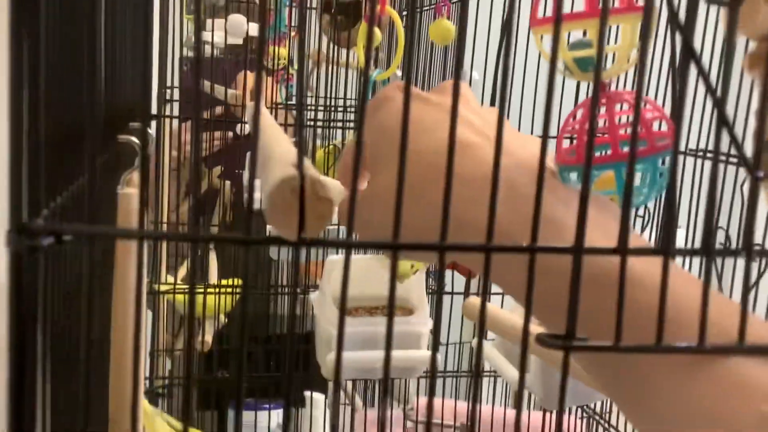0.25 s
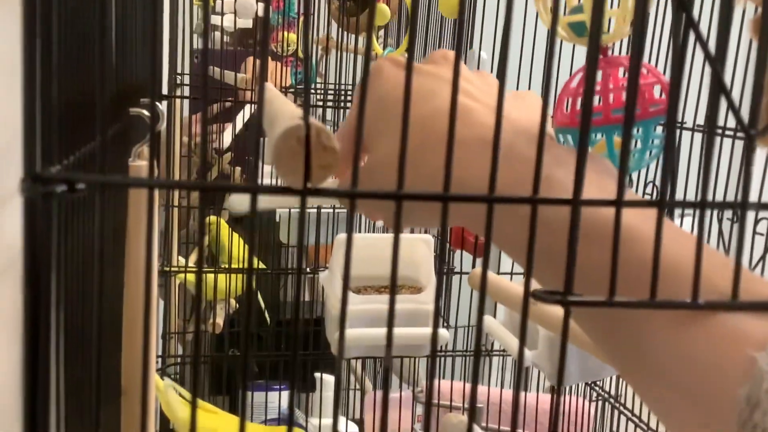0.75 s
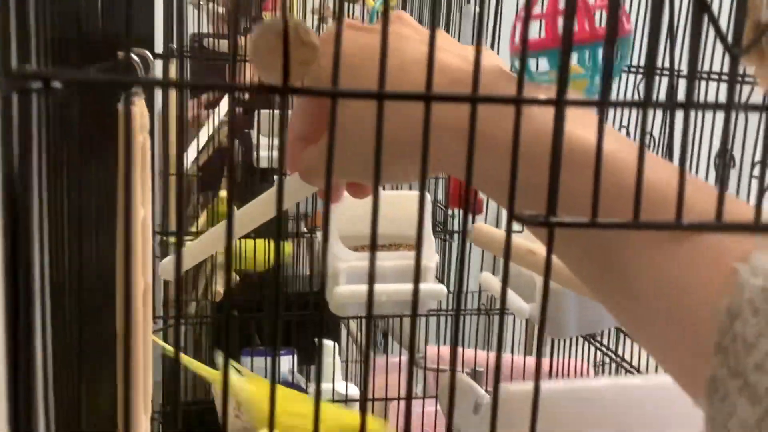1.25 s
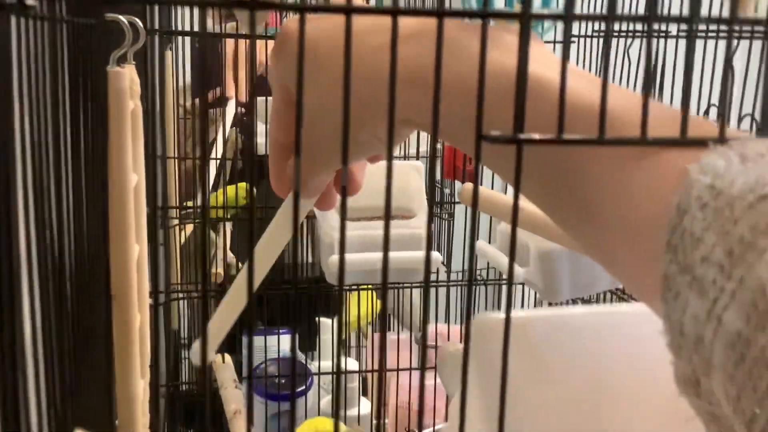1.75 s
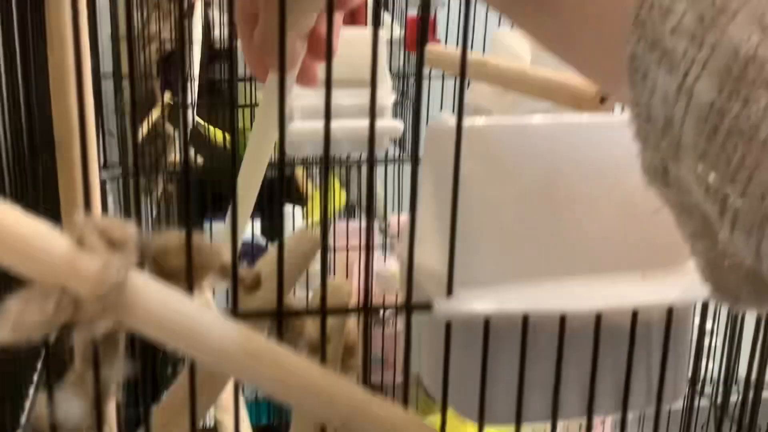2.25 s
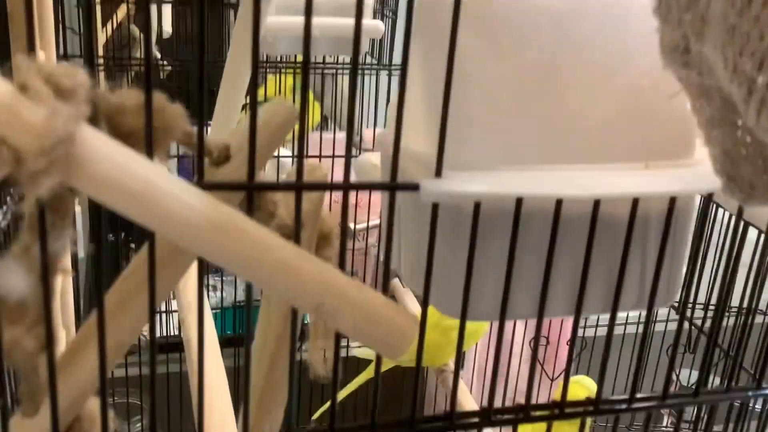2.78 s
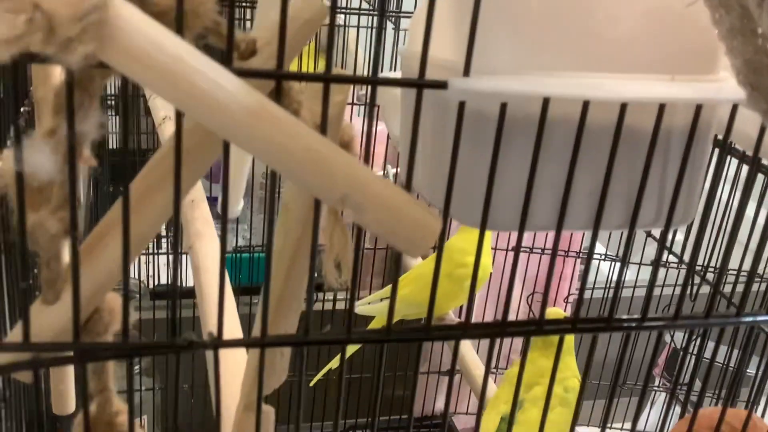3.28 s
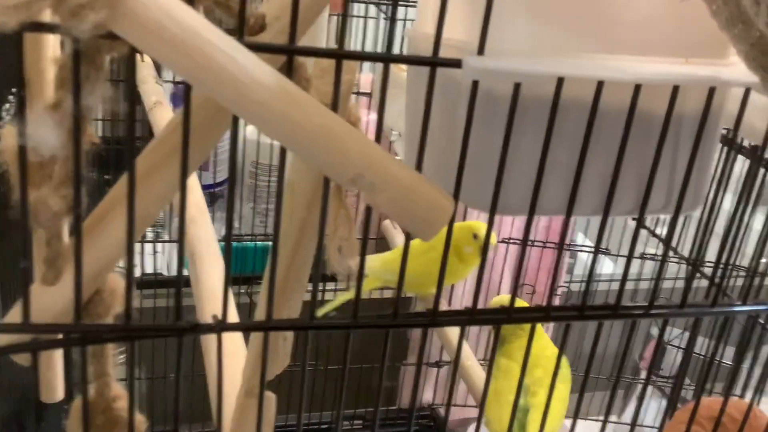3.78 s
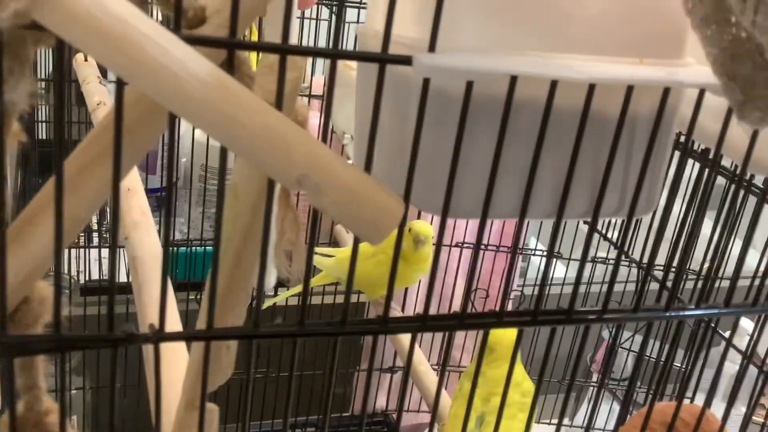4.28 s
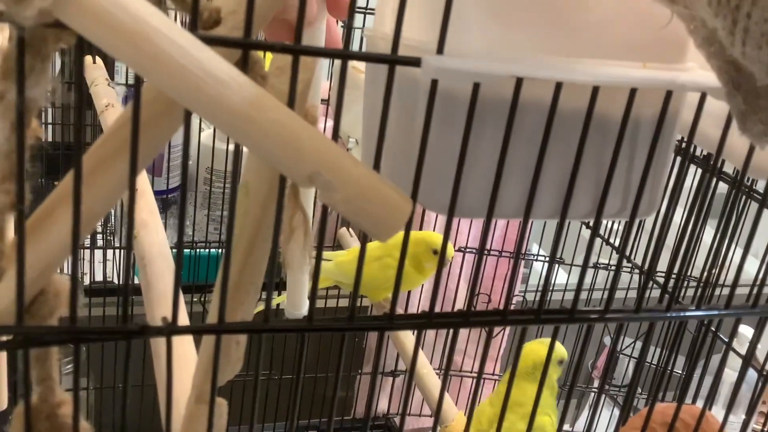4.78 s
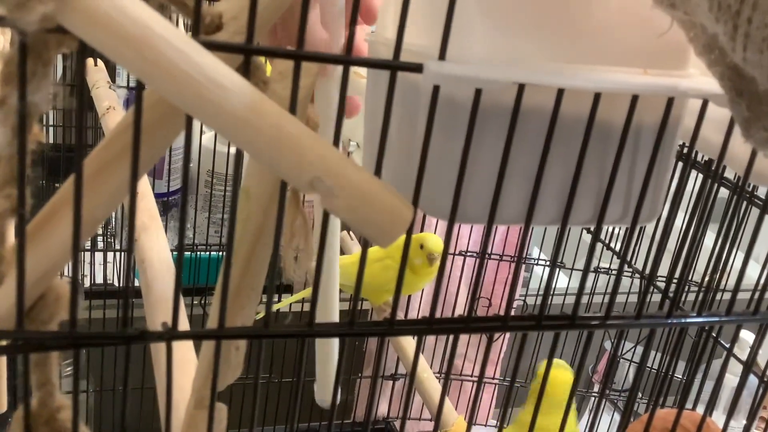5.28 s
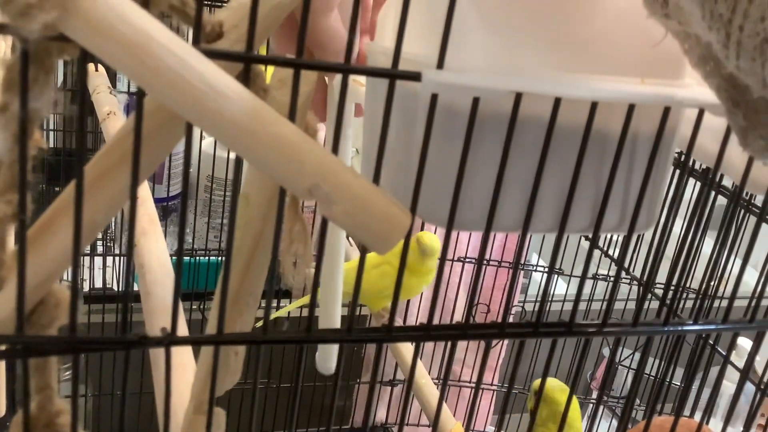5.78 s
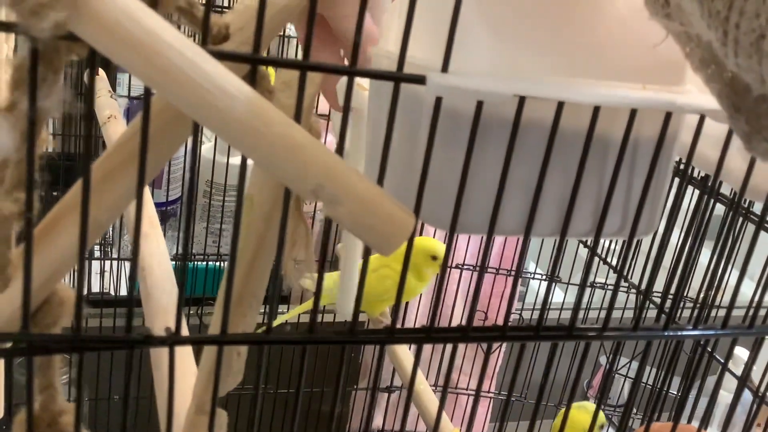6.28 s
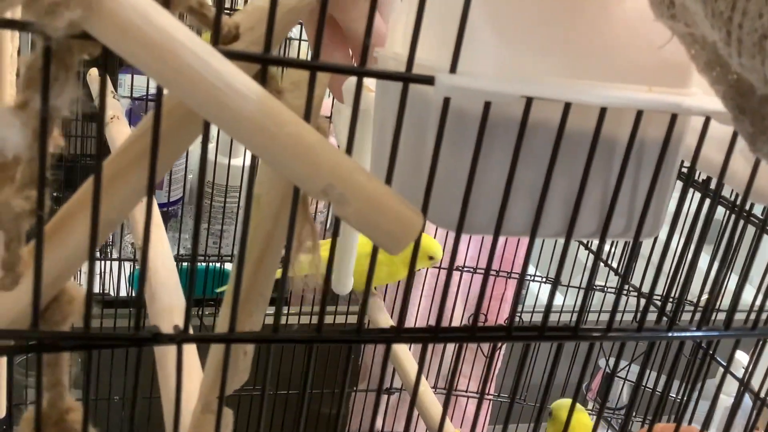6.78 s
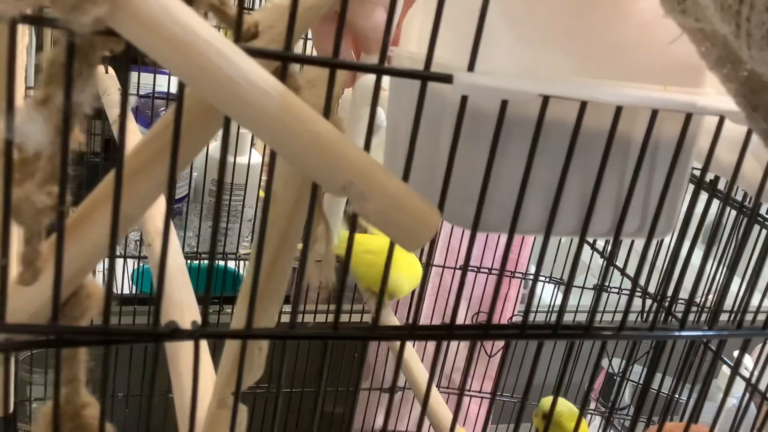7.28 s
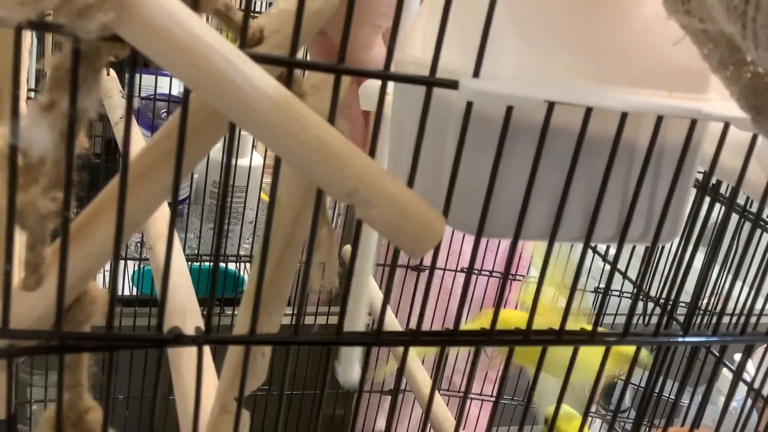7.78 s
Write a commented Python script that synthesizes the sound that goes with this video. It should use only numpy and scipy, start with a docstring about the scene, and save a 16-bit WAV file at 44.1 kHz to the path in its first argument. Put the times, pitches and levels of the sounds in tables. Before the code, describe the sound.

A close, handheld sound of a wire cage in a small, hard room, over very quiet bassy noise. From 0 to 0.4 s a plastic perch scrapes the bars with hiss and a faint metallic ring, while fingers rub the microphone dully. A tick and quick flutter lead at about 0.5 s to a harsh, raspy squawk with whistles in it; a second follows at 1.05 s. Knocks, scraping and a small flutter come near 1.4 s. At 2.3 s a sharp clack, wing puff and very short, loudest squawk coincide. From 2.4 to 3.8 s muffled rubbing and soft, falling thuds dominate. From 3.9 to 7 s there are sparse ticks, hollow plastic rasps, light scrapes and occasional bumps. Around 7.4 s scraping strokes increase, then at 7.75 s a click and a close burst of low, airy wingbeats with feather swish ends it.

```python
"""Frightened budgie in a wire cage

A hand reaches into the cage in a small, hard room and moves a plastic perch: filtered friction, ringing bars, ticks.
The bird flutters (pulsed air and feather noise) and gives three harsh squawks, chaotic pulses against whistles.
Fingers rub and bump the microphone casing (dull friction, falling thuds); at last a bird takes off close by."""
import sys
import numpy as np
from scipy import signal
from scipy.fft import rfft, irfft, next_fast_len
from scipy.io import wavfile
from scipy.ndimage import map_coordinates

SR = 44100
rng = np.random.default_rng(int(sys.argv[2]) if len(sys.argv) > 2 else 0)


def waveform_to_disk(signal):
    """Save audio, clipped to [-1, 1], as 16-bit WAV at the path in sys.argv[1]."""
    frames = np.transpose(np.atleast_2d(signal))
    scaled = np.clip(frames, -1, 1) * 32767
    samples = np.round(scaled).astype(np.int16)
    wavfile.write(sys.argv[1], SR, samples)


N = 354563  # samples

# thin cage wires: centre_hz, width_hz, relative level_db
BARS = [(2318, 110, -1.5), (3100, 76, -4), (4085.4, 150, -2), (4945.3, 210, -2), (5500, 130, 1),
        (8200, 240, -7)]
# hollow body of the perch: centre_hz, width_hz, relative level_db
HOLLOW = [(752.04, 49, 7.5), (1114, 87, -5), (1688, 82, -0.5), (2130, 970, -1.5)]


def amp(db):
    """Decibels to gain."""
    return 10 ** (np.asarray(db) / 20)


def unit(x):
    """Scale to rms 1."""
    return x / np.sqrt(np.mean(x ** 2) + 1e-20)


def along(points, hz):
    """Read (Hz, value) points on a log frequency axis."""
    f, value = np.transpose(points)
    return np.interp(np.log(hz + 1), np.log(f + 1), value)


def clock(length_s):
    """Sample times over a length in seconds."""
    return np.arange(round(length_s * SR)) / SR


def wobble(rate_hz, n):
    """Smooth random curve with rate_hz knots a second."""
    knots = rng.standard_normal(int(n * rate_hz / SR) + 4)
    return map_coordinates(knots, [np.arange(n) * rate_hz / SR])


def add(track, start_s, x):
    """Mix x into the track from start_s, cut at the track's end."""
    start = max(round(start_s * SR), 0)
    track[start:start + len(x)] += x[:max(len(track) - start, 0)]


def colour(x, points):
    """Minimum-phase filter shaped by (Hz, dB) points; the result has rms 1."""
    m = 2 * next_fast_len(len(x) // 2 + 4096)
    gain = amp(along(points, np.fft.rfftfreq(m, 1 / SR)))
    cepstrum = irfft(np.log(gain + 1e-6))
    # fold the cepstrum onto positive time
    cepstrum[1:m // 2] *= 2
    cepstrum[m // 2 + 1:] = 0
    return unit(irfft(rfft(x, m) * np.exp(rfft(cepstrum)))[:len(x)])


def ring(x, modes):
    """Parallel resonances (Hz, width Hz, dB) of alternating sign; the result has rms 1."""
    m = next_fast_len(len(x) + SR // 2)
    f = np.fft.rfftfreq(m, 1 / SR)
    response = 0
    for k, (centre_hz, width_hz, db) in enumerate(modes):
        damping = 1j * f * width_hz
        response = response + (-1) ** k * amp(db) * damping / (centre_hz ** 2 - f * f + damping)
    return unit(irfft(rfft(x, m) * response, m)[:len(x)])


def friction(rate_hz, spread_db, smooth):
    """Stick-slip: random tiny slips of uneven size on a smooth hiss; rms 1."""
    sizes = rng.standard_normal(N) * amp(spread_db * rng.standard_normal(N).clip(-2, 2))
    slips = (rng.random(N) < rate_hz / SR) * sizes
    return unit(unit(slips) + smooth * rng.standard_normal(N))


def envelope(t, length_s, rise_s, fall_s):
    """Soft attack, hold until length_s, exponential release."""
    return (1 - np.exp(-t / rise_s)) ** 2 * np.exp(-np.maximum(t - length_s, 0) / fall_s)


def gestures(rows, rise_s, fall_s):
    """One gain track per dB column of (start_s, length_s, dB, ..) rows; overlaps add in power."""
    power = np.zeros((len(rows[0]) - 2, N))
    for start_s, length_s, *levels in rows:
        shape = envelope(clock(length_s + 10 * fall_s), length_s, rise_s, fall_s)
        for track, db in zip(power, levels):
            add(track, start_s, (amp(db) * shape) ** 2)
    return np.sqrt(power)


def room(x, wet_db, gap_s=.006):
    """Direct sound, a few near reflections and a noise tail with frequency-dependent decay."""
    # tail decay: freq_hz, t60_s
    decay = [(150, 0.47), (1000, 0.51), (3000, 0.31149), (6000, 0.38), (9000, 0.39), (14000, .25)]
    # near surfaces: delay_s, gain
    walls = [(.0019, 0.17), (.0034, 0.11), (.0052, 0.1), (.0083, 0.15), (0.0126, .2), (.019, 0.12)]
    hz, t, z = signal.stft(rng.standard_normal((SR * 3) // 4), SR, nperseg=256)
    fading = z * amp(-60 * t / along(decay, hz)[:, None])
    tail = signal.istft(fading, SR, nperseg=256)[1]
    response = np.pad(amp(wet_db) * tail / np.linalg.norm(tail), (int(gap_s * SR), 0))
    for delay_s, gain in walls:
        add(response, delay_s, [gain])
    response[0] += 1  # direct sound
    return signal.fftconvolve(x, response)[:N]


def background(level_db=-64):
    """Steady quiet noise, strongest in the bass."""
    # noise spectrum: freq_hz, relative level_db
    spectrum = [(15, -44.5), (25, -17.5), (76, 3.5), (107, -2.5), (513, -11.5), (637, -20), (1010, -21),
                (1390, -31.5), (1640, -28.5), (2590, -34.5), (5520, -35), (6310, -35), (10300, -32.5),
                (15800, -36.5)]
    return amp(level_db) * colour(rng.standard_normal(N), spectrum)


def fingers(rise_s=0.015, fall_s=0.026, grip_db=-64.5, grip_swing_db=4.5, grip_rate_hz=11):
    """Dull friction of fingers on the casing: faint all the time, louder when they shift."""
    # finger shifts: start_s, length_s, level_db (before trim)
    rubs = [(0, 0.29, -51), (.25, 1.7, -61), (1.45, 0.37, -50.5), (1.95, 0.2627, -53.5),
            (2.37, 0.12, -43.5), (2.5, 0.2506, -53), (2.7, 0.39216, -45), (3.1, 0.14692, -49),
            (3.35, 0.08258, -48), (3.78, 0.12186, -53.5), (7.5, 0.4387, -56)]
    # rubbing spectrum: freq_hz, relative level_db
    spectrum = [(35, -47), (60, -5.5), (184, 2), (380, -2), (572, -12.5), (694, -26.5), (768, -17.5),
                (900, -17.5), (1170, -47.5), (1980, -120)]
    shifts, = gestures(rubs, rise_s, fall_s)
    grip = amp(grip_db + grip_swing_db * wobble(grip_rate_hz, N))
    rub = colour(friction(rate_hz=400, spread_db=4, smooth=1.3), spectrum)
    return np.hypot(shifts, grip) * amp(-5.5) * rub


def bumps(high_hz=430, low_hz=100, attack_s=0.005, pitch_fall_s=.011, t60_s=.05, rough=0.38):
    """Soft finger bumps disperse in the casing: the higher part arrives first, so pitch falls."""
    # bumps: start_s, level_db (peak is 5 dB lower)
    hits = [(0.961, -33.5), (1.692, -44), (1.77, -47), (2.71, -35.5), (2.809, -34), (3.056, -42),
            (3.171, -43.5), (3.351, -40.5), (3.414, -34), (3.788, -46), (5.052, -41), (5.201, -41),
            (6.372, -34.5), (6.659, -45)]
    out, t = np.zeros(N), np.arange(SR // 8) / SR
    for start_s, db in hits:
        hz = low_hz + (high_hz - low_hz) * np.exp(-t / pitch_fall_s)
        hz = hz * np.exp(0.066 * rng.standard_normal())  # pitch differs from bump to bump
        thud = np.sin(2 * np.pi * np.cumsum(hz) / SR)
        thud *= amp(-60 * t / t60_s) * (1 - np.exp(-t / attack_s)) ** 2
        thud *= 1 + rough * wobble(510, len(t))
        add(out, start_s, amp(db - 5.0) * thud / np.abs(thud).max())
    return out


def handling(rise_s=0.0032, fall_s=0.04):
    """Slips of the sliding perch or arm ring tray and wires, hiss, and make a single bar sing."""
    # slides: start_s, length_s, scrape_db, hiss_db, singing_bar_db (all before trims)
    slides = [(0, 0.0354, -49.5, -50.5, -66), (.045, .035, -42, -45.5, -54), (.135, .03, -42, -51, -55),
              (.2, 0.21, -53.5, -66.5, -68.5), (.6, 0.25, -60.5, -75, -64), (1.2, .17, -57.5, -72, -61),
              (1.38, 0.18, -51.5, -64.5, -63), (1.6, .52, -64, -71.5, -86.5), (2.12, 0.17, -65, -66, -87.5),
              (2.72, 0.2821, -61.5, -76.5, -85), (3.05, 0.18, -68, -83, -90.5),
              (3.6, 0.0963, -71.5, -78.5, -68), (3.77, 0.1522, -70.5, -79.5, -69.5),
              (3.95, 0.15, -58, -69, -63), (4.1, 0.56, -64, -77, -74), (4.77, 0.23, -63.5, -77.5, -78.5),
              (5.17, 0.089, -61, -65.5, -70.5), (5.34, 0.049, -53.5, -75, -66),
              (5.45, 0.45166, -64.5, -81.5, -72), (5.7, 0.13, -63.5, -72, -64),
              (5.95, 0.13, -67.5, -78.5, -79), (6.49, 0.063, -74.5, -74, -76),
              (6.585, .06, -68, -81, -61.5), (6.705, 0.065, -65.5, -81, -56.5),
              (6.8, 0.058, -66, -80, -71.5), (7.18, 0.29, -70.5, -80, -72.5), (7.41, .03, -63, -69, -64),
              (7.48, 0.078, -56, -78, -57.5), (7.59, 0.21, -57.5, -70, -70.5),
              (7.725, .04, -56, -55.5, -75.5)]
    # tray and bars: centre_hz, width_hz, relative level_db
    cage = [(533, 51, 6), (763.34, 41, 2.5), (1020, 62, -1), (1150, 66, -9), (1710, 80, -12)]
    # scrape spectrum: freq_hz, relative level_db
    scrape_points = [(240, -42), (400, -6), (555, -10.5), (848, -3), (1050, -4), (1260, -5), (2800, -18),
                     (4000, -22.5), (5200, -39.5), (8800, -120)]
    # hiss spectrum: freq_hz, relative level_db
    hiss_points = [(1180, -40.5), (2000, -4), (2400, -3), (2800, -5), (4750, -6.5), (6830, -12),
                   (8260, -5.5), (9080, -9.5), (14100, -13.5), (15800, -24)]
    # one rubbed bar: centre_hz, width_hz, relative level_db
    wire = [(1017.8, 10.43, 7), (1670, 39, -22), (5536.4, 69.427, -17)]
    scrape_gain, hiss_gain, singing_gain = gestures(slides, rise_s, fall_s)
    slips = friction(rate_hz=1700, spread_db=0.5, smooth=0.53)
    coarse_slips = friction(rate_hz=1400, spread_db=2.5, smooth=0.48)
    fine_slips = friction(rate_hz=2500, spread_db=2.5, smooth=1)
    scrape = amp(-6.5) * ring(slips, cage) + amp(-8.5) * colour(coarse_slips, scrape_points)
    hiss = amp(-4) * colour(fine_slips, hiss_points) + amp(-7) * ring(slips, BARS)
    singing_bar = amp(-5) * ring(rng.standard_normal(N), wire)
    pressure = amp(1.6 * wobble(25, N))
    return pressure * (scrape_gain * scrape + hiss_gain * hiss) + singing_gain * singing_bar


def strokes(rise_s=0.0015, release_s=.0063):
    """Short firm strokes along the bars rasp brightly and sound the hollow perch."""
    # strokes: start_s, length_s, grit_db, hollow_body_db
    rasps = [(3.62, 0.02989, -66.5, -70.5), (3.946, 0.073, -57.5, -58.5), (4.168, 0.029, -64.5, -64),
             (4.386, 0.0655, -74, -62), (4.543, 0.03156, -80, -64.5), (4.904, 0.07518, -89, -70.5),
             (5.661, 0.07, -61.5, -59), (7.388, 0.05637, -63.5, -70), (7.463, 0.074, -59, -61.5),
             (7.56, 0.046, -64, -68)]
    # grit spectrum: freq_hz, relative level_db
    grit_points = [(1500, -7), (2800, -3), (4200, -6), (5400, -1.5), (6600, -11), (8200, -4), (11000, -6.5),
                   (15500, -17)]
    slips = friction(rate_hz=1500, spread_db=3.5, smooth=0.69)
    grit = unit(colour(slips, grit_points) + amp(-15.5) * ring(slips, BARS))
    grit_gain, hollow_gain = gestures(rasps, rise_s, release_s)
    return grit_gain * grit + hollow_gain * ring(slips, HOLLOW)


def ticks(knock_t60_s=0.051, knock_rise_s=0.0048, snap=1.2, snap_t60_s=0.0023, chatter_t60_s=0.037):
    """Perch or claws touch the bars: a snap with short chatter, and a knock that rings the perch."""
    # touches: start_s, crack_db, knock_db (both before trims), brightness_db per octave
    touches = [(.373, -36, -59, 2.5), (1.371, -38.5, -43, -2), (1.407, -39, -44.5, -3),
               (2.319, -30, -37, -2), (2.852, -44, -49.5, -5), (2.963, -39.5, -62, 0),
               (3.777, -51, -59.5, 1.5), (3.866, -45, -57.5, 0.5), (3.888, -41, -51.5, -3.5),
               (4.016, -34, -52, -2), (4.327, -35, -58, 1.5), (4.343, -37, -68.5, 0.5),
               (4.538, -37.5, -46, 3), (4.776, -47, -59, -2.5), (4.9, -37.5, -48.5, .5),
               (5.164, -44, -60.5, -6.5), (5.183, -44.5, -71.5, -3), (5.209, -43, -66, -8),
               (5.225, -42, -64.5, -6.5), (5.241, -32.5, -67, 0.5), (5.343, -35, -45.5, 1),
               (5.561, -40, -63, 3), (5.753, -31, -51.5, 2.5), (5.897, -50, -70, 2), (6.083, -51, -70, 3),
               (6.705, -54, -57, -2), (6.815, -52, -64, -3), (7.778, -31.5, -45, -1.5)]
    # crack spectrum: freq_hz, relative level_db
    spectrum = [(800, -25.5), (2500, -8), (5300, 1), (7000, 0.5), (9000, 1.5), (15500, 1)]
    # plastic perch: centre_hz, width_hz, relative level_db
    perch = [(512, 34, 9.5), (771, 84, -6), (986, 87.7, -3.5), (1680, 100, -1), (2040, 270, -9),
             (2818, 710, -13.5)]
    out, t = np.zeros(N), np.arange(SR // 5) / SR
    crack_force = snap * amp(-60 * t / snap_t60_s) + amp(-60 * t / chatter_t60_s)
    knock_force = amp(-60 * t / knock_t60_s) * (1 - np.exp(-t / knock_rise_s))
    for start_s, crack_db, knock_db, bright_db in touches:
        tilted = [(hz, db + bright_db * np.log2(hz / 7000)) for hz, db in spectrum]
        crack = colour(rng.standard_normal(len(t)) * crack_force, tilted)
        knock = ring(rng.standard_normal(len(t)) * knock_force, perch)
        add(out, start_s, amp(crack_db - 26) * crack + amp(knock_db - 18) * knock)
    return out


def wings(beat_hz=31, turbulence=0.98, perch_db=-12, swish_depth_db=1.8,
          swish_share=0.2, settle_s=0.17, air_stop_s=0.014):
    """Uneven wing strokes push turbulent air, swish the feathers and brush the hollow perch."""
    # flapping: start_s, length_s, air_build_s, air_db, swish_db (before trim)
    flights = [(0.429, .098, .02, -40, -43), (1.372, .045, .011, -41, -50.5), (2.252, .04, .011, -36, -47),
               (7.745, 0.36, 0.0738, -36.5, -43)]
    # air spectrum of each flight: freq_hz, relative level_db
    gusts = [
        [(26, -39.5), (45, -9.5), (76, 1.5), (146, -7), (312, -8), (393, -18), (450, -8.5), (580, -39.5),
         (990, -120)],
        [(26, -30), (45, -10.5), (75, -4.5), (140, -17), (257, -12), (450, -43.5), (580, -62.5), (990, -120)],
        [(26, -36), (45, -5), (81, -1), (130, -15.5), (204, -8), (281, -26.5), (450, -10), (580, -47),
         (990, -120)],
        [(26, -35.5), (45, -1), (70, 4.5), (162, 2), (225, -2.5), (270, -7), (450, -20), (580, -51),
         (990, -120)],
    ]
    # feather spectrum: freq_hz, relative level_db
    feathers = [(150, -33), (250, -5), (436, -9.5), (649, -7), (900, -12), (1060, -9), (1870, -23),
                (2190, -14.5), (6410, -25.5), (10200, -25), (15800, -31)]
    out = np.zeros(N)
    for (start_s, length_s, build_s, air_db, swish_db), gust in zip(flights, gusts):
        t = clock(length_s + settle_s * 4)
        n = len(t)
        cycle = np.cumsum(beat_hz * np.exp(.3 * wobble(30, n))) / SR
        beats = np.diff(np.floor(cycle), prepend=-1)
        pushes = unit(beats * amp(2 * rng.standard_normal(n)))
        air = colour(pushes + turbulence * rng.standard_normal(n), gust)
        brush_db = swish_depth_db * (np.cos(2 * np.pi * cycle) + wobble(200, n))
        brush = rng.standard_normal(n) * amp(brush_db)
        swish = colour(brush, feathers) + amp(perch_db) * ring(brush, HOLLOW)
        # the air stops with the wings; the feathers swell sooner and settle slowly
        puff = envelope(t, length_s, build_s, air_stop_s)
        add(out, start_s, amp(air_db) * np.sqrt(np.mean(puff ** 2)) * unit(puff * air))
        rustle = envelope(t, length_s, swish_share * build_s, settle_s)
        add(out, start_s, amp(swish_db - 2) * rustle * swish)
    return out


def smear(x, smear_s=.0016):
    """Dispersion: draw every pulse into a short falling sweep, keeping its spectrum."""
    m = next_fast_len(len(x) + SR // 20)
    f = np.fft.rfftfreq(m, 1 / SR)
    delay_s = smear_s * (1 - np.minimum(f / 10000, 1))
    phase = 2 * np.pi * np.cumsum(delay_s) * f[1]
    return irfft(rfft(x, m) * np.exp(-1j * phase), m)[:len(x)]


def unsteady_phase(hz, n, lurch=.018, tremble=.05):
    """Phase of a membrane whose pitch lurches every few milliseconds and trembles in between."""
    drift = lurch * wobble(220, n) + tremble * wobble(1500, n)
    return 2 * np.pi * np.cumsum(hz * (1 + drift)) / SR


def effort(t, length_s, slack, slack_db=26.5, catch_s=.017, catch_db=8, push_db=1, push_width_s=0.0064,
           cut_after_s=.011, cut_db_per_s=2198.5):
    """Call level in dB: swells with pressure, holds, catches, pushes once more and shuts off."""
    def hump(at_s):
        return np.exp(-.5 * ((t - at_s) / push_width_s) ** 2)

    cut_db = cut_db_per_s * np.maximum(t - length_s - cut_after_s, 0)
    return -slack_db * slack - catch_db * hump(length_s - catch_s) + push_db * hump(length_s) - cut_db


def squawk(length_s, swell_s, db, pulse_hz, top_hz, low_hz, low_db, first_tone_db, last_tone_db, throat,
           jitter=.045, rasp=.5, overtone_db=-15, slack_slows=.3, slack_flattens=0.13,
           low_drift_db=-1, tone_swing_db=4.5, flutter_db=1.7):
    """The syrinx flips between chaotic slaps with puffs of noise and the whistles of its two sides."""
    # the rasp thins out while the bird whistles: freq_hz, relative level_db
    closed_throat = [(1200, -16), (2000, -9), (3200, -2.5), (5000, -6)]
    t = clock(length_s + .04)
    n = len(t)
    progress = np.minimum(t / length_s, 1)
    # until the pressure is up, pulses are slower and the whistle flatter
    slack = np.exp(-t / swell_s)
    rate_hz = pulse_hz * (1 - slack_slows * slack)
    whistle_hz = top_hz * (1 - slack_flattens * slack)
    tone_db = first_tone_db + (last_tone_db - first_tone_db) * progress + tone_swing_db * wobble(110, n)
    tone_power = amp(tone_db) ** 2
    purity = tone_power / (1 + tone_power)  # share of the power that is tone
    low_db = low_db + low_drift_db * (progress - .5)

    cycle = np.cumsum(rate_hz * np.exp(jitter * wobble(400, n))) / SR
    slaps = np.diff(np.floor(cycle), prepend=-1) * amp(rng.standard_normal(n))
    opening = unit(np.exp(-1.8 * (cycle % 1)))
    puffs = rasp * opening * rng.standard_normal(n)
    harsh = colour(unit(smear(slaps)) * .55 + puffs, throat)
    harsh = unit((1 - purity) * harsh + purity * colour(harsh, closed_throat))

    high, low = unsteady_phase(whistle_hz, n), unsteady_phase(low_hz, n)
    tones = np.sin(high) + amp(overtone_db) * np.sin(2 * high)
    whistle = unit(np.sqrt(opening) * tones) * amp(1.2 * wobble(200, n))
    low_gain = amp(low_db + 3.8 * wobble(130, n) - 5.5)
    growl = unit(harsh + low_gain * unit(opening * np.sin(low)))
    voice = np.sqrt(purity) * whistle + np.sqrt(1 - purity) * growl
    return unit(voice) * amp(db + effort(t, length_s, slack) + flutter_db * wobble(260, n))


def budgie():
    """Three alarm squawks from the syrinx, the last led in by a short chip."""
    # calls: start_s, last_push_s (after start), swell_s, effort_db (before trim), pulse_hz, whistle_hz,
    # low_voice_hz, low_voice_db (before trim), start_tone_over_rasp_db, end_tone_over_rasp_db
    calls = [(.516, .127, .007, -20.5, 448.66, 6007, 2787, -11.5, -9, -1),
             (1.044, .155, .009, -23, 690, 5366, 3352, -8.5, -0.5, -8),
             (2.318, 0.0012, .001, -38, 190, 3000, 2278, -9, 4.5, -1.5),
             (2.338, 0.014, .0015, -19, 510, 5396, 4067, -8, -2.5, -7)]
    # throat and beak spectrum of each squawk: freq_hz, relative level_db
    throats = [
        [(410, -58), (700, -26.5), (957, -29.5), (1420, -12.5), (2070, -15.5), (2260, -7.5), (2510, -11.5),
         (2830, -6.5), (3810, -9), (5940, -5), (7130, -11), (8670, -7), (11400, -22.5), (14400, -21),
         (15800, -32)],
        [(500, -46), (900, -27.5), (1350, -14), (1750, -16.5), (2500, -8), (3300, -7.5), (4400, -6), (5500, -3),
         (7500, -4), (8300, -13), (10400, -8.5), (12300, -23), (15800, -26)],
        [(600, -37.5), (1300, -22.5), (2100, -10.5), (3000, -5.5), (4100, -4), (5700, 1.5), (6700, -7.5),
         (8700, -5.5), (10300, -19), (15800, -26)],
    ]
    out = np.zeros(N)
    for (start_s, *call), throat in zip(calls, throats + throats[-1:]):  # chip and last squawk share one
        add(out, start_s, amp(-1.5) * squawk(*call, throat))
    return out


def scene():
    """Bird and cage sound in the room; the fingers are right at the microphone."""
    cage = room(handling() + strokes(), wet_db=-8.5) + room(ticks(), wet_db=-6.0)
    bird = room(wings(), wet_db=-10.5) + room(budgie(), wet_db=-5)
    return (background() + fingers() + bumps() + cage + bird)[None]


def record(dry, ceiling=0.64, top_hz=15900):
    """Round off the highest peaks, then keep nothing from top_hz up."""
    held = dry / (1 + (dry / ceiling) ** 6) ** (1 / 6)
    m = next_fast_len(N + SR // 2)
    passed = np.fft.rfftfreq(m, 1 / SR) < top_hz
    return irfft(rfft(held, m) * passed, m)[..., :N]


dry = scene()
out = record(dry)
waveform_to_disk(out)
```